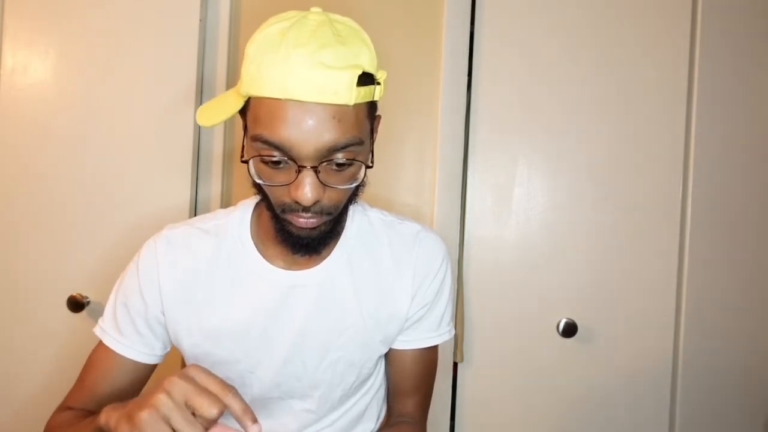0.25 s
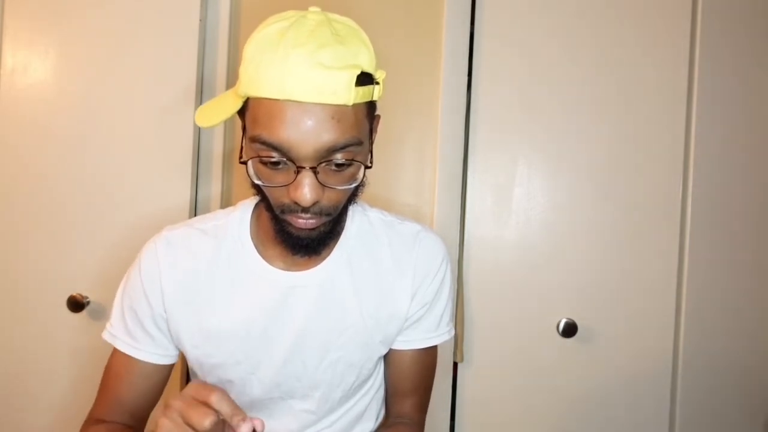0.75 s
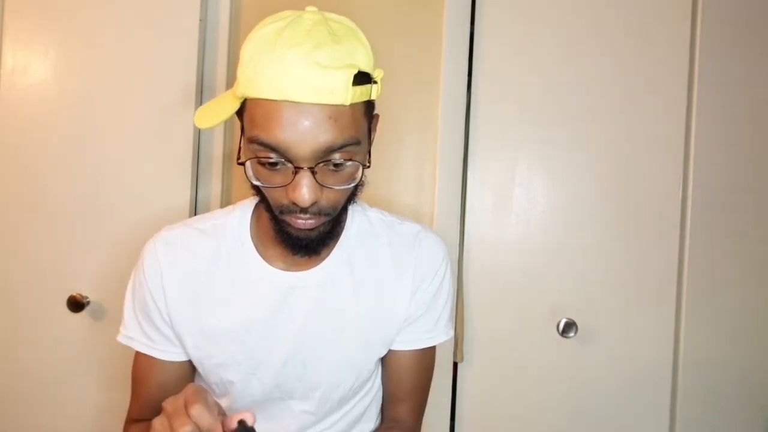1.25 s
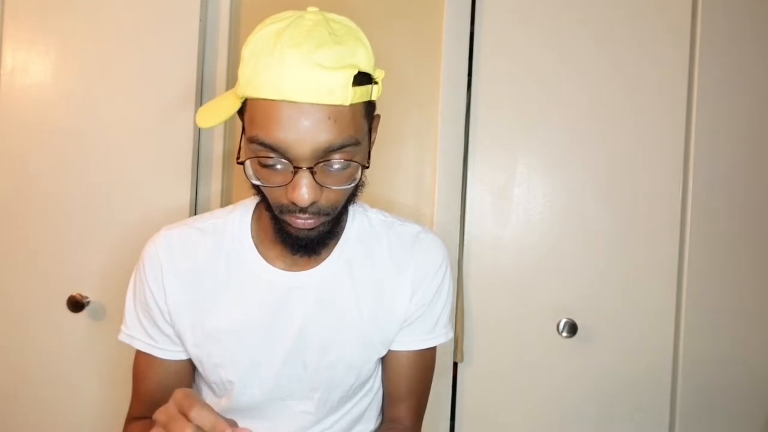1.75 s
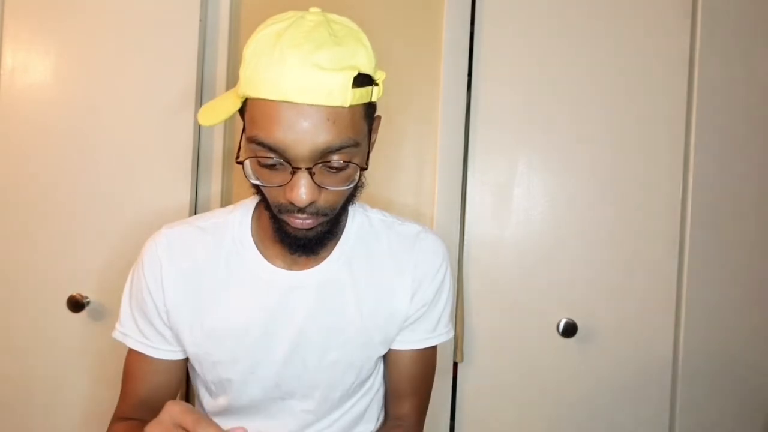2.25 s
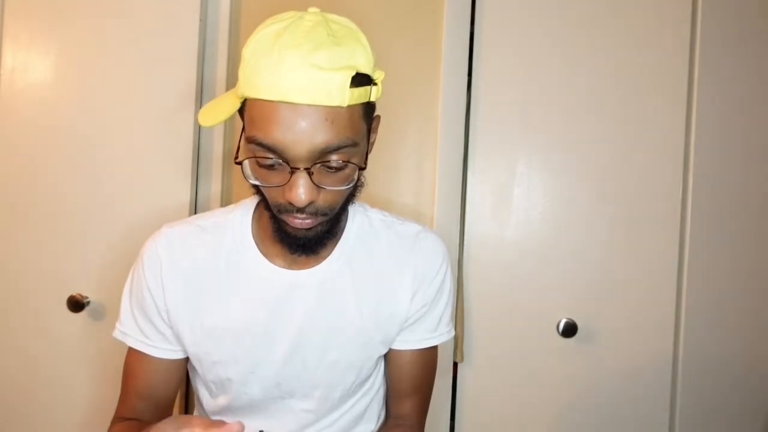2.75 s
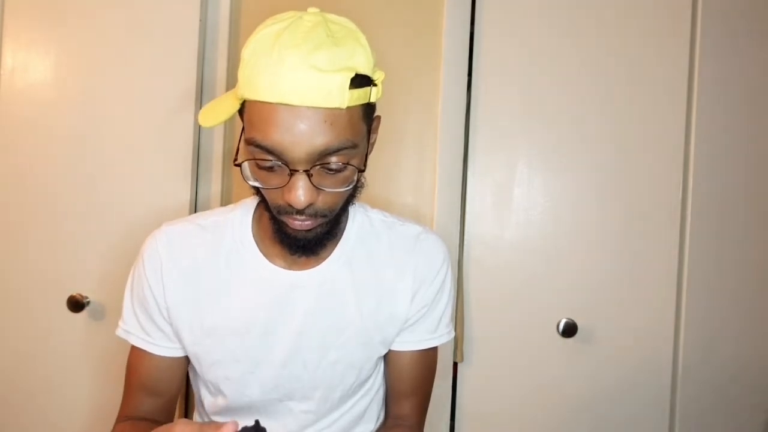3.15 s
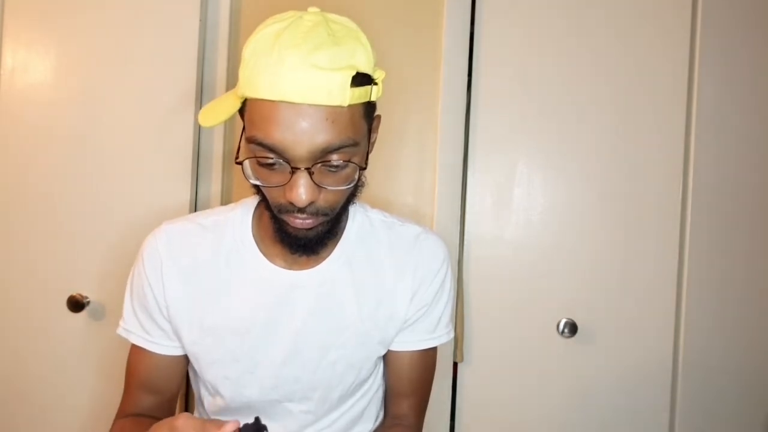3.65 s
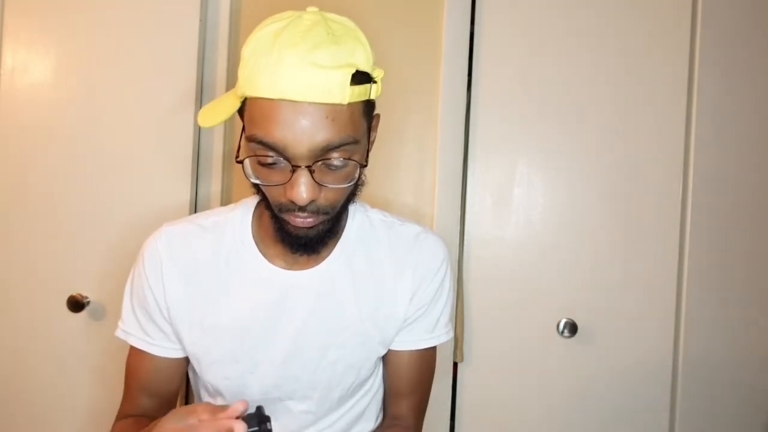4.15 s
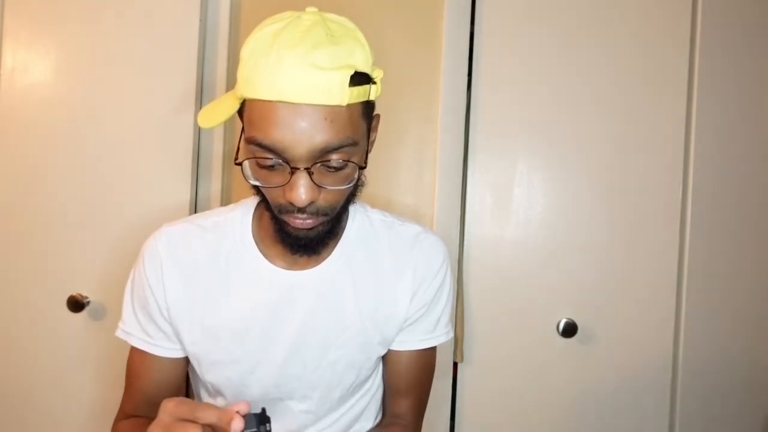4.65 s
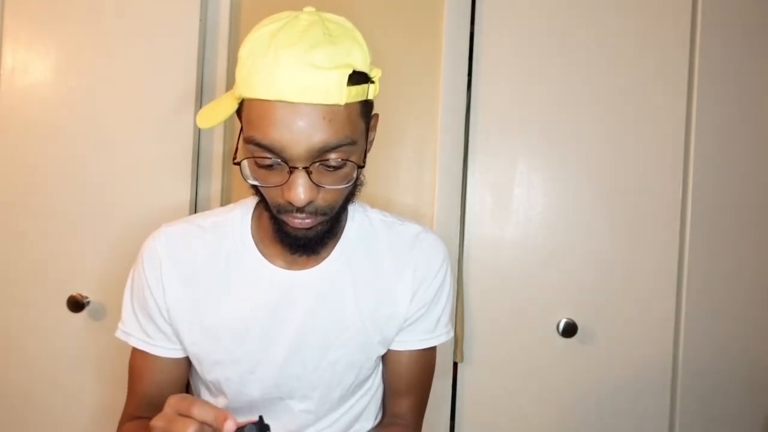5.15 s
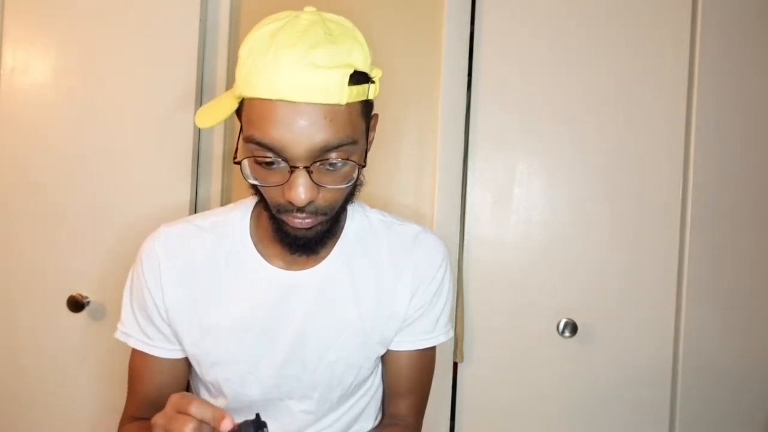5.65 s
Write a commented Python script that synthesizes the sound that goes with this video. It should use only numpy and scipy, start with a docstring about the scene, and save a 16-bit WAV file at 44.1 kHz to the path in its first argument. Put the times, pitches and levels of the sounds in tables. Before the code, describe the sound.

Four crisp, close switch clicks from a small handheld light, the first softer, over faint room air and a very low hum.

```python
"""The push switch of a small flashlight is pressed and let go twice, close by in a quiet, bare room.
Each snap is three impulses (a strike, two rebounds) with a casing noise burst and ringing spring modes.
Reflections and a decaying noise tail, shaped by convolution, give the bright room.
Under it lie filtered air noise and a faint sine hum with a low drone that swells twice."""
import sys
import numpy as np
from scipy import signal
from scipy.fft import rfft, irfft
from scipy.io import wavfile
from scipy.ndimage import uniform_filter1d

SR = 44100
rng = np.random.default_rng(int(sys.argv[2]) if len(sys.argv) > 2 else 0)


def int16_out(signal):
    """Quantize to a 16-bit WAV file."""
    q = np.round(np.clip(np.atleast_2d(signal).T, -1, 1) * 32767)
    wavfile.write(sys.argv[1], SR, q.astype(np.int16))


N = 260137

# Switch snaps. Each row: start in seconds, relative level in dB, casing ring T60 in seconds,
# first and second rebound delay in seconds, rebound level in dB, room gain in dB.
SNAPS = [(1.0939, 0.5, 0.0083, 0.00033, 0.00085, -4, 1.5), (2.0866, 9, 0.0068, 0.00041, 0.0013, -13.5, 3.5),
         (3.6808, 7.5, 0.01, .0006, .0011, -4, 3), (4.4415, 7, 0.0071, 0.0008, .0014, -6.5, 5)]
# Snap spectra; the grip damps the casing differently each time. Each row: frequency in Hz, gain in dB.
LIGHT_PRESS_GAIN = [(300, -30.5), (650, -14), (1150, -30), (1520, -7), (2400, -11.5), (3500, -4),
                    (5200, -3.5), (6400, -10), (7700, 6), (9200, -10), (12800, -8.5), (13700, -17),
                    (15800, -17)]
FIRST_RELEASE_GAIN = [(300, -41), (1100, -34), (1550, -16), (2700, -22), (3900, -12.5), (4800, -9.5),
                      (5500, -12), (6100, 2), (6800, -9.5), (7800, -1), (9000, -6.5), (11500, -12),
                      (13000, -8.5), (15800, -12.5)]
FIRM_PRESS_GAIN = [(250, -21), (420, -16), (640, -3), (920, -23), (1250, -24), (1750, -9), (2500, -16.5),
                   (4000, -7.5), (4700, -5), (5500, -7), (7100, 0.5), (8600, -4.5), (10500, -12),
                   (15800, -12.5)]
LAST_RELEASE_GAIN = [(300, -42), (1100, -38.5), (1900, -15), (2800, -21), (3600, -12.5), (4700, -10.5),
                     (5500, -10.5), (6200, -1.5), (6900, -4), (7900, 0.5), (9300, -4), (11700, -12.5),
                     (12900, -5), (15800, -10)]
# Modes of switch and spring. Each row: frequency in Hz, relative level in dB, T60 in seconds.
SWITCH_MODES = [(4720, -40, 0.036), (6070, -36.5, 0.043), (7460, -51, 0.13), (7900, -60, 0.069),
                (10200, -43, 0.048)]
# Small faint ticks of the switch, ahead of the later three snaps and once after the last.
# Each row: start in seconds, relative level in dB, T60 in seconds.
TICKS = [(2.002, -39, .01), (2.054, -29, 0.01), (3.544, -33.5, 0.0097), (4.414, -19.5, 0.011),
         (4.6772, -27, 0.0045)]
# Tick spectrum. Each row: frequency in Hz, gain in dB.
TICK_GAIN = [(300, -25), (1500, -3), (3000, -9.5), (5000, -1.5), (7500, -1), (10000, -11.5), (15800, -11.5)]
# First reflections. Each row: delay in seconds, level in dB against the mid tail.
ECHOES = [(.0061, -10.5), (.0085, -11.5), (0.0114, -12.5), (.018, -11), (.021, -12.5), (.0253, -15),
          (.028, -11.5)]
# Main room decay. Each row: frequency in Hz, T60 in seconds.
ROOM_T60 = [(500, 0.51), (1500, 0.44), (4000, 0.39), (7500, 0.36), (10000, 0.33), (15000, 0.29)]
# Stereo width of the room. Each row: frequency in Hz, side against mid in dB.
ROOM_SIDE = [(500, -12), (1500, -9.5), (3000, -14), (6000, -18), (15000, -22)]
# Air noise spectrum. Each row: frequency in Hz, relative density in dB per Hz.
AIR_DENSITY = [(32, -19), (55, -9), (75, -9.5), (112, -1), (149, -2.5), (180, -4.5), (303, -5.5),
               (453, -10), (574, -9.5), (1090, -14), (2010, -16.5), (4830, -25), (14400, -28.5),
               (15800, -29.5)]
# Stereo width of the air noise. Each row: frequency in Hz, side against mid in dB.
AIR_SIDE = [(60, -13.5), (130, -6.5), (300, -5), (700, -5), (2000, -5), (5000, -5), (9000, -24.5)]
# Steady hum tones. Each row: frequency in Hz, mean level in dB.
HUM_TONES = [(58.6, -77.5), (123.8, -76.5)]
# Drone swells. Each row: peak time in seconds, peak level in dB, fade in dB per second.
DRONE_SWELLS = [(1.22, -67.5, 28), (4.55, -64, 7.5)]

AIR_MID_DB = -63
DRONE_HZ, DRONE_REST_DB, DRONE_RISE_DB_PER_S = 103.6, -80.5, 58
LOW_CUT_HZ, HIGH_CUT_HZ = 51, 15950


def flashlight(tick_room_db=1):
    """Four snaps of the switch plus small ticks, each coloured and set in the room."""
    out = np.zeros((2, N))
    spectra = [LIGHT_PRESS_GAIN, FIRST_RELEASE_GAIN, FIRM_PRESS_GAIN, LAST_RELEASE_GAIN]
    for row, spectrum in zip(SNAPS, spectra):
        start_s, level_db, *contact, room_db = row
        direct = amp(level_db) * coloured(snap(*contact), spectrum)
        add(out, start_s, in_room(direct, room_db))
    for start_s, level_db, t60_s in TICKS:
        direct = amp(level_db) * coloured(ring(t60_s), TICK_GAIN)
        add(out, start_s, in_room(direct, tick_room_db))
    return out


def snap(t60_s, first_s, second_s, rebound_db, casing_db=4, modes_db=-7, size=4096):
    """The contact strikes and rebounds twice; casing and spring ring on."""
    blows = amp(casing_db) * ring(t60_s)
    for delay_s, level_db in [(0, 0), (first_s, rebound_db), (second_s, rebound_db)]:
        add(blows, delay_s, amp([level_db]))  # one-sample impulse
    blows = flattened(blows, size=130)
    t_s = np.arange(size) / SR
    modes = np.zeros(size)
    for hz, level_db, decay_s in SWITCH_MODES:
        modes += amp(level_db - 60 * t_s / decay_s) * np.cos(2 * np.pi * hz * t_s)
    ringing = signal.fftconvolve(blows, modes)[:size]
    return blows + amp(modes_db) * ringing


def ring(t60_s, size=4096):
    """Dense modes of a small part: an exponentially decaying noise burst of unit energy."""
    burst = rng.standard_normal(size) * amp(-60 * np.arange(size) / SR / t60_s)
    return burst / np.linalg.norm(burst)


def in_room(sound, room_db):
    """Direct sound from straight ahead plus its reflections, left and right."""
    response = amp(room_db) * room()
    response[0, 0] += 1  # direct path, mid only
    mid, side = signal.fftconvolve(sound[None], response, axes=1)
    return np.array([mid + side, mid - side])


def room(gap_s=0.0039, build_s=0.006, early_db=-8, linger_db=-34, linger_t60_s=1.0, scatter_t60_s=0.008):
    """Mid and side response: first reflections, then a tail that builds up and dies faster in the treble."""
    hz, t_s, z = signal.stft(rng.standard_normal((2, SR)), SR, nperseg=256)
    main_fade = amp(-60 * t_s / read(ROOM_T60, hz)[:, None])
    linger = amp(linger_db - 60 * t_s / linger_t60_s)
    tail = signal.istft(z * np.hypot(main_fade, linger), SR, nperseg=256)[1][:, :SR]
    late_s = np.maximum(np.arange(SR) / SR - gap_s, 0)
    tail *= amp(early_db * np.exp(-late_s / build_s))
    tail /= np.linalg.norm(tail[0])
    for delay_s, level_db in ECHOES:  # uneven surfaces smear each reflection
        smear = np.array([ring(scatter_t60_s), ring(scatter_t60_s)])
        add(tail, delay_s, amp(level_db) * smear)
    mid, side = (flattened(part, size=900) for part in tail)
    return np.array([mid, coloured(side, ROOM_SIDE)])


def air(swell_db=0.54, swell_hz=5.5):
    """Nearly steady room noise, wide in the low middle and narrow in the treble."""
    hz = np.fft.rfftfreq(N, 1 / SR)
    z = rfft(rng.standard_normal((2, N))) * amp(read(AIR_DENSITY, hz))
    mid = irfft(z[0], N)
    side = irfft(z[1] * amp(read(AIR_SIDE, hz)), N)
    level = amp(AIR_MID_DB + swell_db * drift(swell_hz))
    return np.array([mid + side, mid - side]) / mid.std() * level


def hum(waver_db=2, waver_hz=2.7, wander_rad=0.4, wander_hz=3.7):
    """Low sines of distant machinery, wavering in level and phase; one swells into a drone."""
    t_s = np.arange(N) / SR
    out = np.zeros(N)
    for hz, level_db in list(HUM_TONES) + [(DRONE_HZ, drone_db(t_s))]:
        level = np.sqrt(2) * amp(level_db + waver_db * drift(waver_hz))  # dB is rms
        out += level * np.sin(2 * np.pi * hz * t_s + wander_rad * drift(wander_hz))
    return out


def drone_db(t_s):
    """Level of the drone: each swell rises quickly and sinks back toward rest, linearly in dB."""
    swells = []
    for peak_s, peak_db, fade_db_per_s in DRONE_SWELLS:
        drop_db = np.maximum(DRONE_RISE_DB_PER_S * (peak_s - t_s), fade_db_per_s * (t_s - peak_s))
        swells.append(peak_db - drop_db)
    return np.maximum(np.max(swells, axis=0), DRONE_REST_DB)


def drift(hz):
    """Slow random variation of rms one: noise rolled off above the given rate."""
    f = np.fft.rfftfreq(N, 1 / SR)
    return evened(irfft(rfft(rng.standard_normal(N)) / (1 + (f / hz) ** 4), N))


def amp(db):
    """Converts dB to amplitude."""
    return 10 ** (np.asarray(db) / 20)


def evened(x):
    """Scales to an rms of one."""
    return x / np.sqrt(np.mean(x ** 2) + 1e-20)


def read(points, hz):
    """Interpolates a table on a log-frequency axis."""
    f, value = np.transpose(points)
    return np.interp(np.log(hz + 1), np.log(f + 1), value)


def add(mix, start_s, sound):
    """Mixes a sound in place at the given time, cut at the end of the mix."""
    part = mix[..., max(round(start_s * SR), 0):][..., :sound.shape[-1]]
    part += sound[..., :part.shape[-1]]


def coloured(x, points, size=4096):
    """Minimum-phase filter with the given spectrum: it adds nothing ahead of the strike."""
    hz = abs(np.fft.fftfreq(size, 1 / SR))
    log_gain = np.log(amp(read(points, hz)))
    response = np.fft.ifft(np.exp(np.conj(signal.hilbert(log_gain)))).real
    return signal.fftconvolve(x, response)[:len(x)]


def flattened(x, size):
    """Evens out the broad spectrum of a burst, leaving its fine structure and an energy of one."""
    z = rfft(x, 2 * len(x))
    broad_power = abs(uniform_filter1d(abs(z) ** 2, size))
    even = irfft(z / np.sqrt(broad_power + 1e-12))[:len(x)]
    return even / np.linalg.norm(even)


def scene():
    """Sums the flashlight, the air noise and the centred hum."""
    return flashlight() + air() + hum()


def record(dry):
    """Steep filters remove the deep bass and the highest treble."""
    high_pass = signal.cheby1(8, 1, LOW_CUT_HZ, "high", fs=SR, output="sos")
    thin = signal.sosfilt(high_pass, dry)
    low_pass = signal.firwin(255, HIGH_CUT_HZ, window=("kaiser", 8), fs=SR)
    return signal.oaconvolve(thin, low_pass[None], "same")


dry = scene()
out = record(dry)
int16_out(out)
```